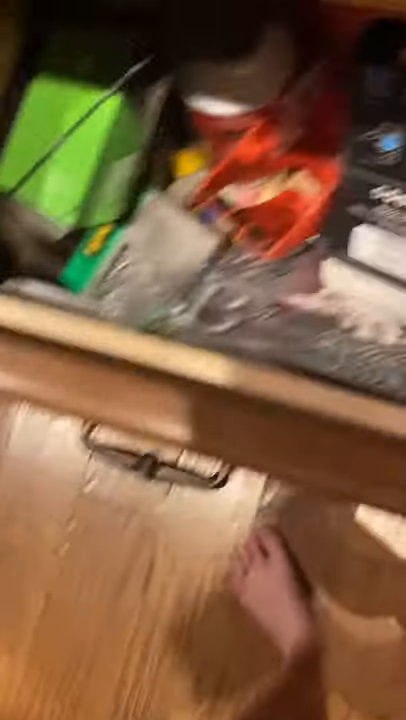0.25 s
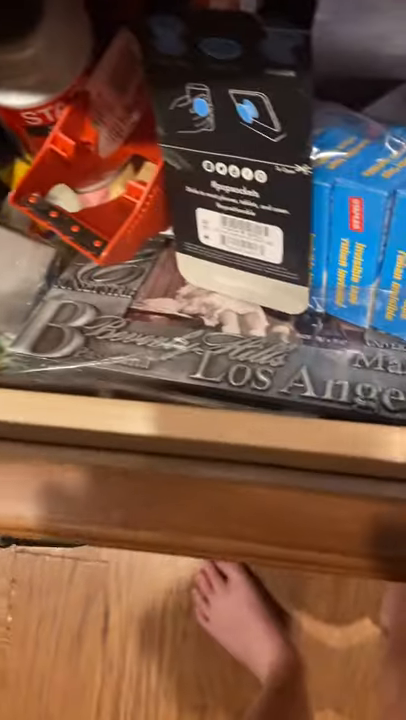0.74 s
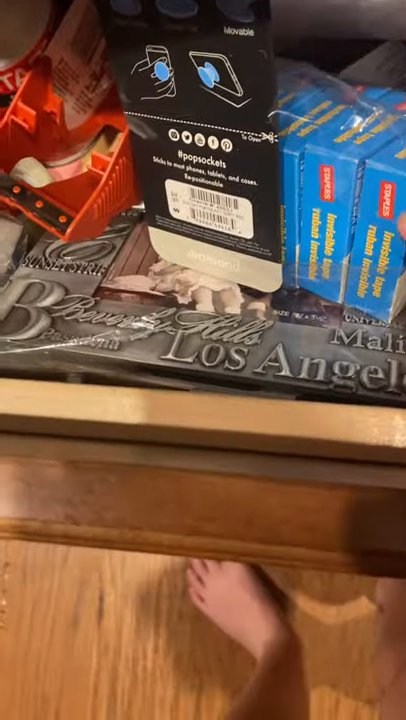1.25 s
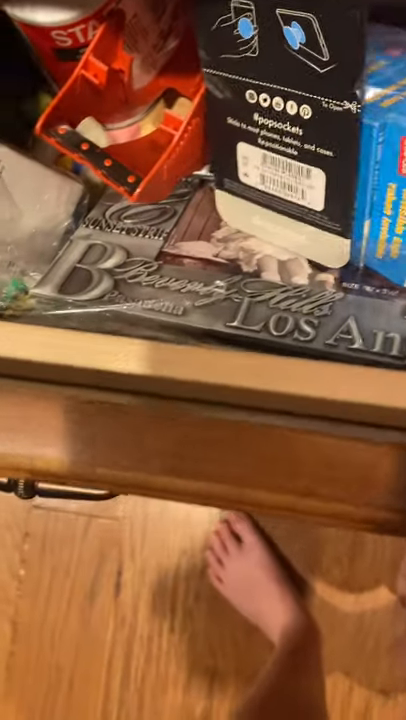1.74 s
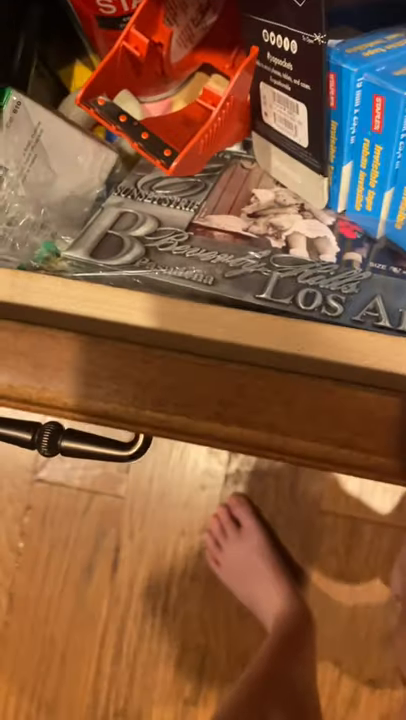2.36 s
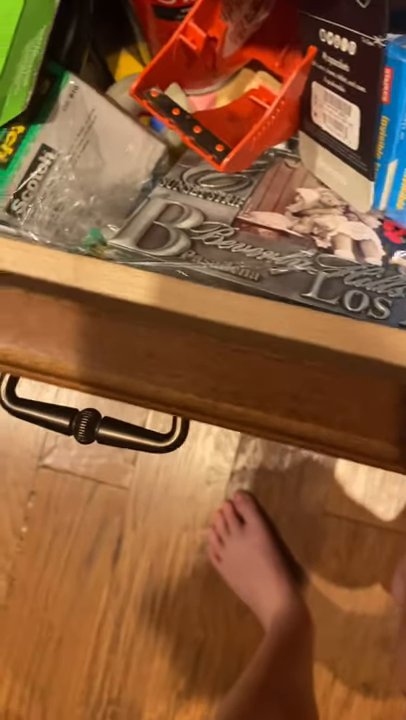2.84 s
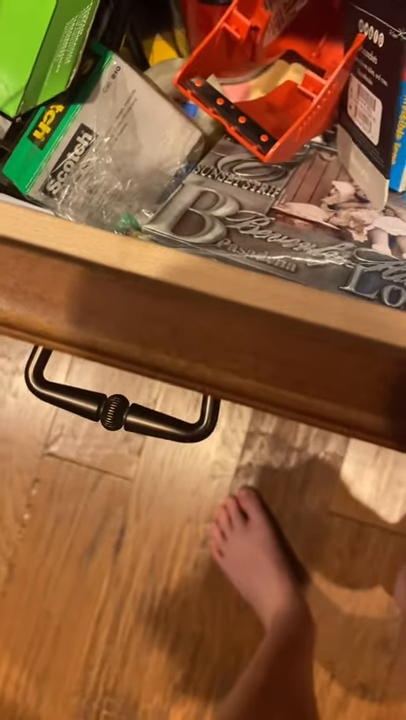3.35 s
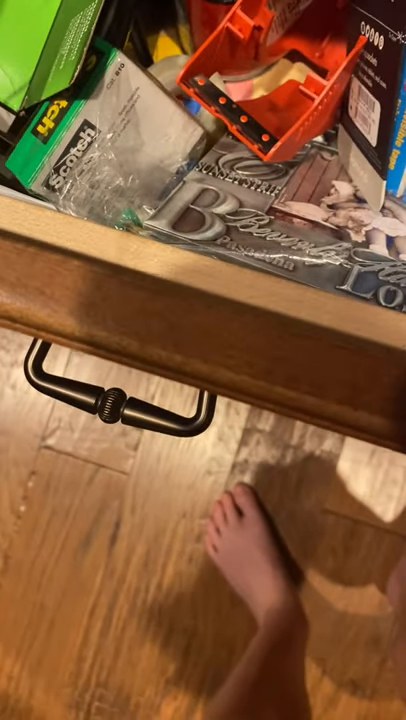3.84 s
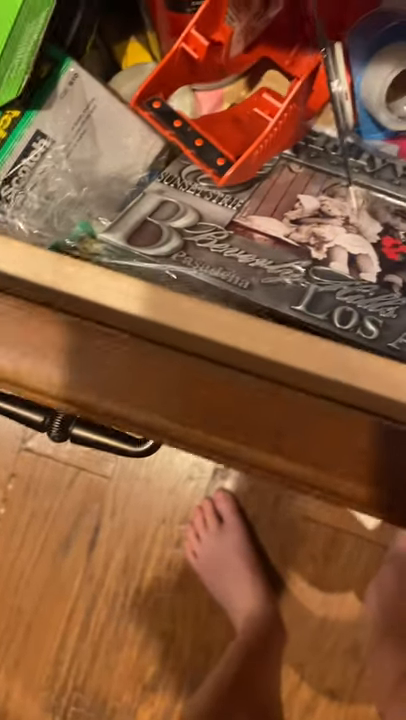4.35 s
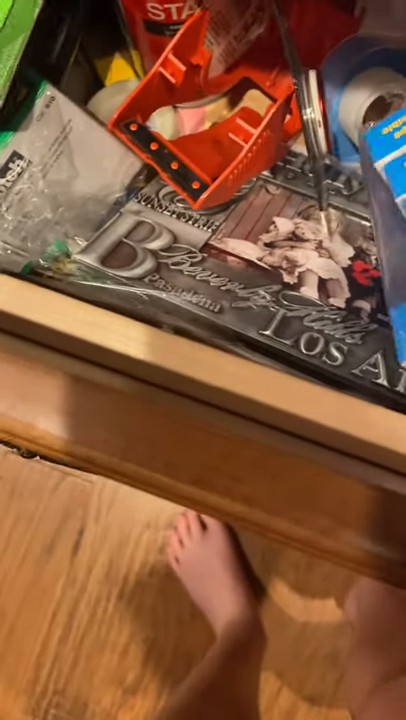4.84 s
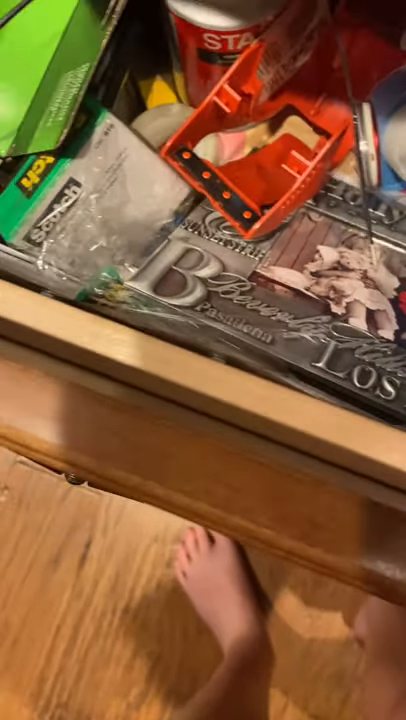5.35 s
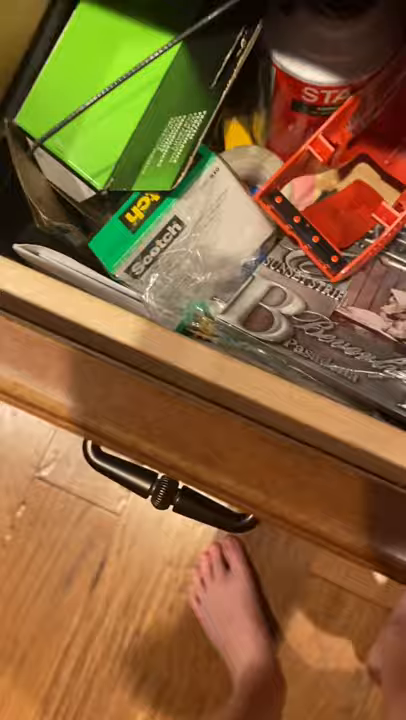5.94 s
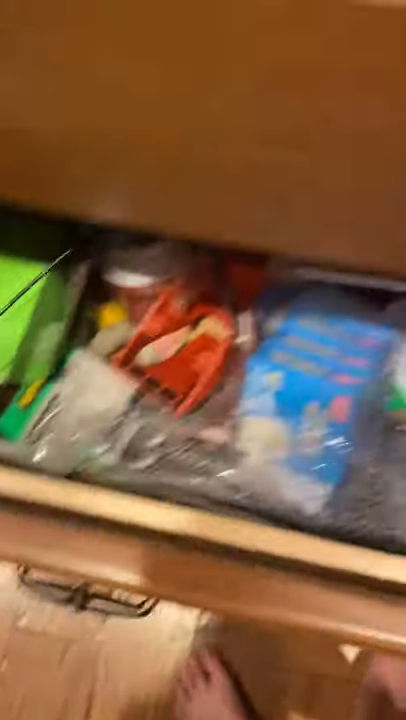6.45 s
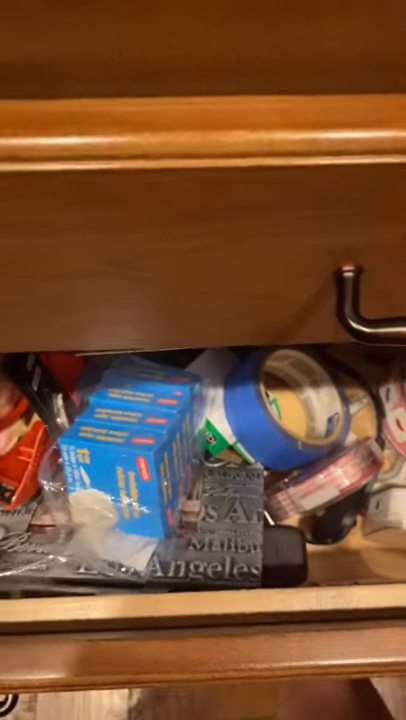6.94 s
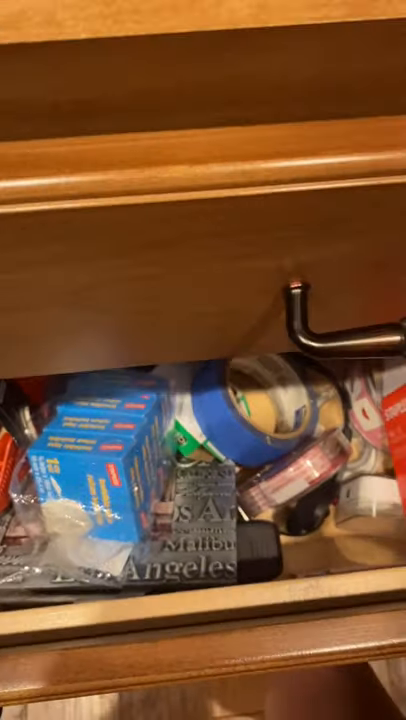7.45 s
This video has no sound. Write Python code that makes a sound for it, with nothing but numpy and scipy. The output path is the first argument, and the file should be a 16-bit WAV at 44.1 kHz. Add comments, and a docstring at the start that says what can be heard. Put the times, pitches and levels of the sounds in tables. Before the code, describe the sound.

A hand rummages in a wooden drawer, plastic wrapping crackling and snapping ever more busily over hollow box knocks, then stops with soft clicks.

```python
"""A short, faint crinkle of thin plastic opens; then snaps, taps and scrapes build as a hand rummages in a
wooden drawer in a small room, pulling about a wrapped pack of cardboard boxes. Film is made of tiny filtered
noise bursts and hiss, taps of noise ticks through resonators, and the boxes of decaying modes, short hollow
notes and rough noise. The pack slides to rest with a low boom and a few last clicks; two spaced microphone
ports hear it all."""
import sys
import numpy as np
from scipy import signal
from scipy.fft import rfft, irfft, next_fast_len
from scipy.io import wavfile
from scipy.ndimage import uniform_filter1d

SR = 44100
rng = np.random.default_rng(int(sys.argv[2]) if len(sys.argv) > 2 else 0)


def int16_out(signal):
    """Quantize to a 16-bit WAV file."""
    q = np.round(np.clip(np.atleast_2d(signal).T, -1, 1) * 32767)
    wavfile.write(sys.argv[1], SR, q.astype(np.int16))


N = 339129
TIME = np.arange(N) / SR  # s

# The hand's grip under the pulls, before layer trims: [t/s, wrapping level/dB, box-shifting level/dB]
GRIP_CURVE = [(0, -50.5, -58), (.12, -85, -87), (.92, -80, -77), (1.1, -65, -65), (1.34, -56, -77),
              (1.46, -45.5, -52.5), (2.17, -46.5, -57), (2.4, -48.5, -48), (2.78, -53.5, -55),
              (3.2, -51.5, -53), (3.8, -39.5, -51), (4.4, -32.5, -39), (4.59, -43.5, -49.5),
              (4.8, -34.5, -41), (5.35, -35.5, -44.5), (5.85, -27.5, -32.5), (6.05, -33, -48),
              (6.37, -36.5, -41), (6.45, -54.5, -43.5), (6.52, -59, -52.5), (6.8, -91.5, -88),
              (7.69, -100, -73)]
# Short pulls and pushes on the pack, before layer trims:
# [start t/s, length/s, wrapping level/dB, box-shifting level/dB]
PULL_EVENTS = [(0, 0.0035, -42, -59), (0.254, 0.07, -56, -67), (0.379, 0.14, -53, -68),
               (0.573, 0.145, -67.5, -71.5), (1.053, 0.02, -48.5, -60), (1.12, 0.039, -44.5, -55),
               (1.22, 0.052, -48.5, -57), (1.52, 0.1, -42.5, -48.5), (1.665, 0.032, -37.5, -48.5),
               (1.792, 0.12, -40.5, -44), (2.266, 0.046, -38.5, -37.5), (2.367, 0.075, -35.5, -48),
               (2.515, 0.071, -38, -44.5), (2.605, 0.065, -35, -46), (2.806, 0.077, -42, -47),
               (2.97, 0.17, -35.5, -46.5), (3.23, 0.14, -43.5, -50), (3.397, 0.19, -34.5, -43.5),
               (3.879, 0.089, -30, -43.5), (4.007, 0.077, -32, -44), (4.199, 0.082, -27.5, -35),
               (4.448, 0.03, -23.5, -40.5), (4.514, 0.042, -31.5, -56), (4.657, 0.11, -27.5, -37),
               (4.806, 0.066, -27.5, -35), (4.953, 0.027, -29, -37), (5.073, 0.063, -27, -40),
               (5.201, 0.1, -34, -34), (5.412, 0.067, -26, -40.5), (5.554, 0.082, -31.5, -50.5),
               (5.694, 0.1, -25, -32), (5.838, 0.14, -31, -35.5), (6.096, 0.0043, -18, -25.5),
               (6.152, 0.11, -28, -33.5), (6.564, 0.13, -49.5, -62), (6.895, 0.2, -83, -56),
               (7.394, 0.054, -100, -64), (7.585, 0.076, -100, -63.5)]
PULL_RISE_S, PULL_RELEASE_S = 0.01, 0.011  # every pull takes hold, holds and lets go alike

# How bright the crinkles sound as the hand moves over the wrapping: [t/s, tilt/(dB per octave)]
CRINKLE_TILT = [(0, -0.5), (1.3, -2), (1.7, -3), (2.5, -1), (3.9, 0.5), (4.4, 0), (5.4, -0.5), (6.2, -1),
                (6.7, 0)]
CRINKLE_DECAY_S, CRINKLE_RISE_S = .001, .0005  # the decay is scaled at random for each crease
CRINKLE_TILT_SCATTER_DB = 2  # creases differ by up to this much per octave either way
FACET_LOW_HZ, FACET_HIGH_HZ = 1486, 6560  # range in which the small facets ring
FACET_FREE_HZ = 1900  # lesser resonances of a facet are free above this, weaker below

# The loudest creases that snap through: [t/s, level/dB, tilt/(dB per octave), facet ring f/Hz]
SNAP_EVENTS = [(0.2015, -62, -2, 4750), (0.2833, -45, 1.5, 1230), (0.299, -36.5, 1, 1780),
               (0.398, -43.0, -0.5, 4770), (0.4252, -36.5, 1.5, 745), (0.4398, -32, 4, 6250),
               (0.5063, -45, -1.5, 1670), (0.9596, -43.5, 2.5, 3530), (1.01, -53, -0.5, 1310),
               (1.052, -37, 2.5, 850), (1.1075, -39.5, 0, 800), (1.144, -37, 2, 2720),
               (1.202, -41.5, -3.5, 5400), (1.239, -39.5, 0.5, 850), (1.258, -37.5, 4, 2010),
               (1.3064, -30.5, 1.5, 740), (1.388, -36.5, -0.5, 3240), (1.4487, -36.5, -4.5, 750),
               (1.5613, -28, -0.5, 2170), (1.578, -35.5, -7.5, 3300), (1.6723, -32, -4.5, 740),
               (1.6911, -27.5, 3, 800), (1.7864, -26.5, -3, 2920), (1.8186, -26.5, 4, 1160),
               (1.826, -25.5, -3.5, 3320), (1.8417, -31.5, -2, 3490), (1.8603, -27.5, -3.5, 2280),
               (1.911, -30.0, -2.5, 2740), (1.978, -35, 9, 1310), (2.029, -28.5, 4.5, 750),
               (2.1158, -33.0, 1, 902), (2.1822, -32, -1.5, 1800), (2.2653, -33, 2, 750),
               (2.2868, -24, -1.0, 2140), (2.3136, -27, 4.5, 2280), (2.3493, -25.5, -1, 1900),
               (2.441, -32, -4.5, 2740), (2.4902, -26.0, -0.5, 4830), (2.5023, -26, 0, 735),
               (2.545, -23.5, 0.0, 6370), (2.634, -26, 1, 1230), (2.6485, -27, 1, 2170),
               (2.756, -30.5, -2.5, 1160), (2.8235, -27, 0.5, 3140), (2.8674, -32, 0.5, 1157),
               (2.9433, -38, 1, 906), (3.017, -35, -5, 2720), (3.0418, -35.5, 6, 965),
               (3.0645, -28, 2.5, 738), (3.2418, -30, -1.5, 750), (3.2664, -26.5, -1, 1018),
               (3.3035, -23.5, -1, 1300), (3.3918, -34.5, -3.0, 1310), (3.417, -24.5, 1, 1174),
               (3.459, -26, 0.5, 856), (3.4796, -26, -2.5, 736), (3.4934, -20, 9, 750),
               (3.522, -25.5, 0.5, 900), (3.544, -23, 1.5, 6640), (3.635, -32.5, 5.5, 750),
               (3.651, -27.5, 0, 795), (3.724, -29.5, 3.5, 1090), (3.7987, -32, 6, 3300),
               (3.8601, -26, 1.5, 1390), (3.964, -26.5, -1.5, 1090), (4.1414, -25.5, -1, 2015),
               (4.2672, -30.5, 4.5, 960), (4.2997, -26.5, -2.5, 852), (4.438, -27.5, 0.5, 4490),
               (4.4625, -20.5, 3.5, 2750), (4.6055, -37.5, 0.5, 1480), (4.6696, -28, 1.5, 750),
               (4.6968, -22, 3.5, 750), (4.8605, -20, 2.5, 850), (5.0097, -29.0, -2.5, 5000),
               (5.042, -29.5, 3, 750), (5.1167, -25.5, 0.5, 3770), (5.1422, -25.5, -1.5, 1570),
               (5.1776, -27.5, 1, 1394), (5.196, -22, 0.5, 800), (5.2949, -23, -2.5, 3510),
               (5.356, -26.5, -1, 1383), (5.43, -22.5, 2.5, 1026), (5.5152, -22, -0.5, 6500),
               (5.563, -23.5, 1, 1890), (5.5933, -19.5, 7, 960), (5.607, -23, -2.5, 1033),
               (5.7043, -23, -2, 906), (5.7899, -25.5, -0.5, 6600), (6.0236, -22.5, -1, 1170),
               (6.0536, -28.5, 2.5, 2310), (6.1023, -30, -1, 1160), (6.148, -25.5, -1, 2130),
               (6.1632, -22.5, 6.5, 4810), (6.1866, -21.5, 0, 2403), (6.2165, -19, 5.5, 1017),
               (6.249, -23, 1, 1157), (6.3287, -29.5, 0, 1230), (6.405, -33.5, -1, 6110),
               (6.4953, -42, -0.5, 2740), (6.659, -35, -1.5, 748)]
SNAP_DECAY_S, SNAP_SCATTER = .0012, .4  # base decay, and the random part of it
SNAP_HALVING_DB = 13  # a crease this much brighter per octave dies twice as fast

# Hard things tapping each other, mostly plastic, a few of them cardboard boxes: # [t/s, level/dB, ring f/Hz,
# upper ring f/Hz, ring strength against the tick]
TAP_EVENTS = [(0.4794, -56, 800, 2200, 1.8), (0.55, -32, 2750, 4900, 2.7), (0.569, -50, 1900, 1400, 2.6),
              (0.6154, -33.5, 2040, 3900, 0.36), (1.1247, -32.5, 793, 2300, 4.9),
              (4.834, -25, 1090, 5428, 3), (5.497, -23.5, 1498, 3600, 4.8),
              (5.8337, -27.5, 2120, 5250, 4.6), (6.577, -21.5, 2390, 4510, 4.3),
              (7.0871, -30.5, 1214, 2220, 4.1), (7.161, -53.5, 1290, 1850, 12),
              (7.1957, -33, 1795, 5000, 4.2)]

# Boxes bumping the drawer: [t/s, level/dB, pitch factor on the modes]
KNOCK_EVENTS = [(0.648, -57.5, 1.5), (1.404, -36, 0.9), (1.904, -39, 1.17), (2.0609, -40, 2),
                (2.065, -40, 1.22), (2.2194, -27.5, 0.81), (2.2205, -44.5, 2.6), (2.249, -33.5, 0.81),
                (2.641, -38, 1.4), (2.827, -43.5, 1), (2.852, -48, 1.32), (3.415, -36, 1.1),
                (3.477, -39, 1.03), (3.951, -29, 1.13), (4.042, -40.5, 0.8), (4.241, -32, 0.91),
                (4.346, -8.5, 1.016), (4.392, -32.5, 0.83), (4.469, -26.5, .9), (4.479, -28.5, .6),
                (4.788, -33.5, 0.93), (4.865, -31, 0.99), (5.048, -34, 1.42), (5.104, -39, 1.03),
                (5.702, -28.5, 1.05), (5.798, -21, 0.78), (5.801, -27, 3.3), (5.952, -26.5, 1),
                (6.021, -28, 0.93), (6.105, -34, 0.23), (6.107, -30, 0.69), (6.158, -31.5, 0.8),
                (6.2, -27, 1.4), (6.256, -30, 1.1), (6.333, -33.5, 0.68), (6.63, -47, 1.23),
                (6.891, -41, 0.83), (6.89, -43.5, 1.66), (6.954, -46.5, 1.38), (6.999, -42.5, 2.4),
                (7.002, -42.5, 1.27), (7.013, -42, 0.65), (7.393, -65, 2.35), (7.413, -58.5, 1)]
# Resonances of a box on the drawer floor at pitch 1: [f/Hz, relative level/dB, t60/s]
BOX_MODES = [(122, -10.5, .3), (168, -3.5, .3), (200, -8.5, .15), (235, -12, .09), (283, .5, .15),
             (359, -2.5, .15), (517, -3.5, .04), (630, -14, .07), (953, -8.5, .07)]
HARDNESS_HZ, HARDER_WITH_LEVEL = 802, 0.034  # contact corner at pitch 1 and 0 dB; its growth per dB
BLOW_CYCLES = 2.0  # the modes line up this many cycles of the main mode into a blow

# The cardboard pack slides to rest, before the layer trim: [start t/s, length/s, level/dB]
SLIDE_STROKES = [(6.024, 0.0043, -32.5), (6.191, .016, -31.5), (6.245, 0.0036, -44), (6.574, 0.015, -41.5),
                 (6.624, 0.017, -40), (6.654, 0.0051, -51), (6.89, 0.0094, -51), (6.918, 0.19, -56.5),
                 (6.991, .004, -40), (7.045, .015, -55), (7.394, 0.027, -75.5)]
SLIP_RISE_S, SLIP_RELEASE_S = .004, .026

# The drawer itself shifts with a rumble, then its panel rings out
RUMBLE_START_S, RUMBLE_LENGTH_S, RUMBLE_DB = 6.9, 0.18, -48
RUMBLE_LOW_HZ, RUMBLE_HIGH_HZ = 75, 233
BOOM_S, BOOM_DB, BOOM_HZ, BOOM_T60_S = 7.068, -38.5, 95.6, 0.4

# Colour of a snapping crease: [f/Hz, relative level/dB]
CREASE_SPECTRUM = [(100, -32.5), (400, -11.5), (780, -4), (1200, -7), (2300, -1.1), (3000, -2), (4200, 3.5),
                   (5300, 5), (7500, 3.5), (10500, 2), (12500, 3.5), (15000, -2.3)]
# Colour of the thin film and of the tap ticks: [f/Hz, relative level/dB]
FILM_SPECTRUM = [(100, -16), (400, -10.5), (780, -5), (1200, -5), (2300, -4), (3000, -4), (4200, -1.5),
                 (5300, 1.5), (7500, -1), (10500, 0), (12500, -1), (15600, -3)]
# Hollow colour of the drawer floor at pitch 1: [f/Hz, relative level/dB]
DRAWER_SPECTRUM = [(25, -24), (55, -8), (95, -7), (125, -3.5), (170, 1.5), (220, -1.5), (285, 4.5),
                   (375, 2), (470, -10), (750, -13), (1200, -24.5), (3000, -46)]
# Pitch factors on the drawer colour as the load shifts: [factor]
DRAWER_PITCHES = [.9, 1, 1.15]
# Colour of rubbing cardboard: [f/Hz, relative level/dB]
CARDBOARD_SPECTRUM = [(120, 7.5), (420, 0), (520, -14.5), (620, 1.5), (720, -5.5), (830, -14.5), (1050, -2),
                      (1700, 0), (2300, -5.5), (4000, -10), (6000, -18.5), (15000, -28.5)]
# Colour of the room's quiet background: [f/Hz, relative level/dB]
AIR_SPECTRUM = [(20, 1.5), (55, 12), (120, 5), (300, -11), (550, -5.5), (750, -10.5), (1200, -21),
                (2500, -23), (6000, -22), (16000, -25.5)]

# Decay of the room's tail: [f/Hz, t60/s]
ROOM_DECAY = [(100, 0.3), (300, 0.35), (1500, 0.45), (5000, 0.34), (10000, 0.077), (16000, 0.077)]
# Phase by which the left microphone port leads: [f/Hz, phase/rad]
LEFT_LEAD = [(20, 0), (2400, .1), (3000, 1.5), (3600, .8), (4400, .8), (5000, .15), (6000, 1.6), (6900, 3),
             (7900, 3.3), (9800, 6.15), (11200, 6.6), (12700, 9), (14200, 9.75), (15700, 12)]
# Likeness of the two ports' signals: [f/Hz, share from 0 to 1]
LIKENESS = [(100, .99), (400, .985), (650, .88), (2100, .95), (2850, .55), (3400, .8), (4600, .68),
            (7300, .95), (8800, .74), (10300, .92), (15500, .72)]
# Left port minus right port: [f/Hz, level/dB]
LEFT_RIGHT_BALANCE = [(60, -.5), (300, -2.46), (650, -7), (1500, -1.5), (2100, 0), (2800, -5.5), (3500, 0),
                      (4300, -2), (5200, 1), (7000, -0.5)]
EDGE_HZ = 15850  # upper band limit


def amp(db):
    """Amplitude of a level in dB."""
    return 10 ** (np.asarray(db) / 20)


def evened(x):
    """Scales to rms 1."""
    return x / np.sqrt(np.mean(x ** 2) + 1e-20)


def read(points, hz):
    """Reads a table on a log-frequency axis."""
    f, value = np.transpose(points)
    return np.interp(np.log(hz + 1), np.log(f + 1), value)


def follow(rows):
    """The columns of a curve at every sample."""
    s, *columns = np.transpose(rows)
    return [np.interp(TIME, s, column) for column in columns]


def add(mix, s, sound):
    """Mixes a sound in at time s."""
    part = mix[..., max(round(s * SR), 0):][..., :sound.shape[-1]]
    part += sound[..., :part.shape[-1]]


def smooth(x, seconds):
    """Two running means in a row."""
    size = max(int(seconds * SR), 1)
    return uniform_filter1d(uniform_filter1d(x, size), size)


def octaves(hz):
    """Octaves from the middle of the treble, over the range in which brightness acts."""
    return np.log2(np.clip(hz, 1000, 12000) / 4000)


def causal(gain_db):
    """Frequency response with this gain whose ringing follows the attack (minimum phase)."""
    cepstrum = irfft(np.log(amp(gain_db)))
    half = cepstrum.shape[-1] // 2
    cepstrum[..., 1:half] *= 2
    cepstrum[..., half + 1:] = 0
    return np.exp(rfft(cepstrum))


def colour(x, spectrum, size=4096):
    """Filters by a spectrum and keeps the power of white noise."""
    response = irfft(causal(read(spectrum, np.fft.rfftfreq(size, 1 / SR))))
    response /= np.linalg.norm(response)
    return signal.oaconvolve(x, response[None], axes=1)[:, :x.shape[1]]


def grain_power(per_s, spread_db, decay_s, even_s):
    """Power of random grains of varied size, each dying quickly, evened to a local mean of about 1."""
    sizes = amp(spread_db * np.minimum(rng.exponential(1, N), 4)) ** 2
    kicks = sizes * (rng.random(N) < per_s / SR)
    power = signal.lfilter([1], [1, -np.exp(-2 / (decay_s * SR))], kicks) + 1e-6
    return power / np.maximum(smooth(power, even_s), 1e-6)


def stroke(start, length, rise_s, release_s):
    """Attack, hold and release of one movement, between 0 and 1 at every sample."""
    attack = np.clip((TIME - start) / rise_s, 0, 1)
    return attack * np.exp(-np.clip((TIME - start - length) / release_s, 0, 20))


def effort():
    """Grip and pulls add in power: the wrapping and box-shifting levels in dB at every sample."""
    film, boxes = amp(follow(GRIP_CURVE)) ** 2
    for start, length, film_db, boxes_db in PULL_EVENTS:
        power = stroke(start, length, PULL_RISE_S, PULL_RELEASE_S) ** 2
        film = film + amp(film_db) ** 2 * power
        boxes = boxes + amp(boxes_db) ** 2 * power
    return 10 * np.log10(film), 10 * np.log10(boxes)


def cracks(shape, spectrum, tilt_db, ring_hz, ring_db, own_db, sharpness=6.2, count=20):
    """Unit-energy bursts (2, events, samples): each facet has a main ring and lesser treble resonances."""
    events, size = shape.shape
    hz = np.fft.rfftfreq(size, 1 / SR)
    knots = np.linspace(np.sqrt(300), np.sqrt(EDGE_HZ), count)
    bumps = np.array([np.interp(np.sqrt(hz), knots, row) for row in np.eye(count)])
    bumps *= np.minimum(hz / FACET_FREE_HZ, 1)
    own = own_db * rng.standard_normal((events, count)) @ bumps
    ratio = (hz + 1) / ring_hz[:, None]
    ring = 10 * np.log10(1 + amp(ring_db) ** 2 / (1 + (sharpness * (ratio - 1 / ratio)) ** 2))
    gain_db = read(spectrum, hz) + ring + tilt_db[:, None] * octaves(hz) + own
    noise = rng.standard_normal((2, events, size))
    burst = rfft(shape * noise) * causal(gain_db)
    energy = (abs(burst[..., hz < EDGE_HZ]) ** 2).sum(-1, keepdims=True) * 2 / size
    return irfft(burst / np.sqrt(energy))


def crinkle(level_db, per_s=600, busy_growth=.35, spread_db=5.0, count=7000, size=256):
    """Tiny creases buckle in the film, mostly faint and a few loud; harder work makes them denser."""
    tilt_db, = follow(CRINKLE_TILT)
    place, chance, strength, ring, stiffness, facet = rng.random((count, 6)).T
    at, t = (place * (N - size)).astype(int), np.arange(size) / SR
    # per_s holds 9.5 dB below the hardest work
    rate = per_s * amp(busy_growth * (level_db[at] - level_db.max() + 9.5))
    sizes = amp(spread_db * np.minimum(-np.log(strength), 3.7))
    sizes *= chance < rate * N / SR / count
    decay_s = CRINKLE_DECAY_S * (.5 + ring[:, None])
    shape = np.exp(-t / decay_s) * (1 - np.exp(-t / CRINKLE_RISE_S))
    ring_hz = FACET_LOW_HZ * (FACET_HIGH_HZ / FACET_LOW_HZ) ** facet
    tilts = tilt_db[at] + CRINKLE_TILT_SCATTER_DB * (2 * stiffness - 1)
    grains = sizes[:, None] * cracks(shape, FILM_SPECTRUM, tilts, ring_hz, ring_db=6.5, own_db=4.0)
    where = (at[:, None] + np.arange(size)).ravel()
    film = np.array([np.bincount(where, side.ravel(), N) for side in grains])
    # the creases share out the work that the hand puts in
    local_power = smooth((film ** 2).mean(0), 0.033)
    return amp(level_db) * film / np.sqrt(np.maximum(local_power, 1e-4))


def scrape(level_db, gain_db=-6, growth=0.43):
    """Film catches and slides over cardboard: a rough hiss that gains on the crinkle in hard pulls."""
    catches = grain_power(per_s=650, spread_db=-1.5, decay_s=0.0039, even_s=0.099)
    hiss = colour(np.sqrt(catches) * rng.standard_normal((2, N)), FILM_SPECTRUM)
    return amp(level_db + gain_db + growth * (level_db - level_db.max())) * hiss


def jostle(level_db, gain_db=-4.0, shift_s=.06):
    """Boxes stick and slip on the drawer floor; its hollow rumble changes pitch as their weight shifts."""
    slips = grain_power(per_s=300, spread_db=1, decay_s=.004, even_s=.02)
    shares = abs(smooth(rng.standard_normal((len(DRAWER_PITCHES), N)), shift_s))
    shares /= np.linalg.norm(shares, axis=0) + 1e-12
    rumble = np.zeros((2, N))
    for pitch, share in zip(DRAWER_PITCHES, shares):
        spectrum = [(hz * pitch, db) for hz, db in DRAWER_SPECTRUM]
        rumble += colour(share * np.sqrt(slips) * rng.standard_normal((2, N)), spectrum)
    return amp(level_db + gain_db) * rumble


def clatter(level_db, gain_db=-9.0, per_s=130, low_hz=520, high_hz=2200, sharpness=6.7, count=14):
    """Box corners and small things nudge each other, each with a short hollow note of its own."""
    out = np.zeros(N)
    for hz in np.geomspace(low_hz, high_hz, count):
        nudges = rng.uniform(-1.01, 1, N) * (rng.random(N) < per_s / count / SR)
        out += np.sqrt(low_hz / hz) * signal.lfilter(*signal.iirpeak(hz, sharpness, SR), nudges)
    return amp(level_db + gain_db) * evened(out)


def air(level_db=-73):
    """The quiet background of the room: steady coloured noise."""
    return amp(level_db) * colour(rng.standard_normal((2, N)), AIR_SPECTRUM)


def snaps(rattle_db=-19, rattle_s=0.0084, rise_s=0.00055, size=2048):
    """A crease flips with a sharp crack, and the sheet around it shivers briefly."""
    out, t = np.zeros((2, N)), np.arange(size) / SR
    s, db, tilt_db, ring_hz = np.transpose(SNAP_EVENTS)
    decay_s = SNAP_DECAY_S * (1 + SNAP_SCATTER * rng.uniform(-0.51, 1, (len(s), 1)))
    decay_s = decay_s * .5 ** np.clip(tilt_db[:, None] / SNAP_HALVING_DB, -1, 1)
    shape = np.exp(-t / decay_s) + amp(rattle_db) * np.exp(-t / rattle_s)
    shape *= 1 - np.exp(-t / rise_s)
    bursts = cracks(shape, CREASE_SPECTRUM, tilt_db, ring_hz, ring_db=11.0, own_db=3.0)
    bursts *= np.sqrt(.006 * SR)  # energy of 6 ms at rms 1
    for k in range(len(s)):
        add(out, s[k] - rise_s, amp(db[k]) * bursts[:, k])
    return out


def taps(upper=0.13, sharpness=3.3, linger=1.5, linger_sharpness=70, tick_s=0.0026, tilt_db=2,
         rattle_db=-25, rattle_s=0.018, size=4096):
    """A tick of contact excites two short resonances of a small plastic shell or a box; the first one lingers."""
    out, t = np.zeros((2, N)), np.arange(size) / SR
    spectrum = [(f, level + tilt_db * octaves(f)) for f, level in FILM_SPECTRUM]
    shape = np.exp(-t / tick_s) + amp(rattle_db) * np.exp(-t / rattle_s)
    shape *= 1 - np.exp(-t / 0.00018)
    for s, db, hz, upper_hz, shell in TAP_EVENTS:
        tick = colour(rng.standard_normal((2, size)) * shape, spectrum)
        rings = [(1, hz, sharpness), (upper, upper_hz, sharpness), (linger, hz, linger_sharpness)]
        ringing = sum(g * signal.lfilter(*signal.iirpeak(f, q, SR), tick) for g, f, q in rings)
        sound = evened(tick + shell * ringing)
        add(out, s, amp(db) * sound * np.sqrt(.006 * SR / size))  # energy of 6 ms at rms 1
    return out


def knocks(rise_cycles=1.94, thud_cycles=4.2, linger_db=-16, scuff_db=-23, scuff_s=0.014, size=16000):
    """A bump swells the modes, high ones first; clutter damps them in a few cycles, a faint ring lingers."""
    out, t = np.zeros(N), np.arange(size) / SR
    mode_hz, mode_db, t60 = np.transpose(BOX_MODES)[:, :, None]
    main_mode_hz = mode_hz[np.argmax(mode_db)]
    for s, db, pitch in KNOCK_EVENTS:
        hz, main_hz = mode_hz * pitch, main_mode_hz * pitch
        corner_hz = HARDNESS_HZ * pitch * amp(HARDER_WITH_LEVEL * db)  # higher, louder knocks are harder
        swell = 1 - np.exp(-(t * hz / rise_cycles) ** 2)
        damping = np.exp(-(t * main_hz / thud_cycles) ** 2) + amp(linger_db)
        swing = np.sin(2 * np.pi * hz * (t - BLOW_CYCLES / main_hz))
        ring = amp(mode_db - 60 * t * np.sqrt(pitch) / t60) * swell * damping * swing
        thud = (ring / np.sqrt(1 + (hz / corner_hz) ** 4)).sum(0)  # soft contact mutes the upper modes
        thud /= np.sqrt(np.sum(thud ** 2) / (.01 * SR))  # energy of 10 ms at rms 1
        contact = signal.butter(2, min(2 * corner_hz, SR / 4), fs=SR)
        scuff = evened(signal.lfilter(*contact, rng.standard_normal(size))) * np.exp(-t / scuff_s)
        add(out, s, amp(db) * (thud + amp(scuff_db) * scuff))
    return out


def slide(gain_db=-2.0):
    """Cardboard rubs along the drawer floor in short slips and one longer rough scrape."""
    level = np.zeros(N)
    for s, length, db in SLIDE_STROKES:
        level += amp(db + gain_db) * stroke(s, length, SLIP_RISE_S, SLIP_RELEASE_S)
    slips = grain_power(per_s=550, spread_db=4.5, decay_s=0.0025, even_s=.02)
    return level * colour(np.sqrt(slips) * rng.standard_normal((2, N)), CARDBOARD_SPECTRUM)


def drawer_shift(rise_s=0.01, release_s=0.057):
    """The whole drawer rumbles as it moves; as it stops, its panel booms and dies away."""
    band = signal.butter(2, [RUMBLE_LOW_HZ, RUMBLE_HIGH_HZ], "band", fs=SR, output="sos")
    rumble = evened(signal.sosfilt(band, rng.standard_normal(N)))
    rumble *= stroke(RUMBLE_START_S, RUMBLE_LENGTH_S, rise_s, release_s)
    t = np.maximum(TIME - BOOM_S, 0)
    decay = amp(BOOM_DB - 60 * t / BOOM_T60_S)
    boom = np.minimum(t / rise_s, 1) * decay * np.sin(2 * np.pi * BOOM_HZ * t)
    return amp(RUMBLE_DB) * rumble + boom


def room(x, near_db=-13, near_s=0.0011, far_db=-19):
    """Quick echoes from the drawer walls, then the faint tail of the room, dying at its own rate per band."""
    t = np.arange(SR // 2) / SR
    shape = (2, len(t))
    echo_pulses = rng.choice([-1., 1.], shape) * (rng.random(shape) < 4000 / SR) * (t > .002)
    hz, frame_s, bands = signal.stft(echo_pulses, SR, nperseg=256)
    decay = amp(-60 * frame_s / read(ROOM_DECAY, hz)[:, None])
    far = signal.istft(bands * decay, SR, nperseg=256)[1][:, :len(t)]
    near = echo_pulses * np.exp(-t / near_s)
    echoes = amp(near_db) * near / np.linalg.norm(near[0]) + amp(far_db) * far / np.linalg.norm(far[0])
    return signal.fftconvolve(x, echoes, axes=1)[:, :N]


def ports(x):
    """Two spaced microphone ports: the left leads in phase, and likeness and balance vary with pitch."""
    size = next_fast_len(N + SR // 10)
    hz = np.fft.rfftfreq(size, 1 / SR)
    shared, separate = rfft(x, size)
    same = np.clip(read(LIKENESS, hz), 0, 1)
    delay = np.exp(-1j * read(LEFT_LEAD, hz))
    lean = amp(read(LEFT_RIGHT_BALANCE, hz) / 2)
    left = shared * lean
    right = (same * shared + np.sqrt(1 - same ** 2) * separate) * delay / lean
    return irfft(np.array([left, right]), size)[:, :N]


def scene():
    """Wrapping and boxes in the drawer, with echoes and background, heard by both ports."""
    film_db, boxes_db = effort()
    contents = crinkle(film_db) + scrape(film_db) + jostle(boxes_db) + snaps() + taps() + slide()
    contents[0] += clatter(boxes_db) + knocks() + drawer_shift()  # row 0 is what both ports share
    return ports(contents + room(contents) + air())


def record(dry, low_cut_hz=45):
    """The microphone's bass roll-off and the recorder's band limit."""
    thinned = signal.lfilter(*signal.butter(2, low_cut_hz, "high", fs=SR), dry)
    band_limit = signal.firwin(401, EDGE_HZ, window=("kaiser", 8), fs=SR)
    return signal.oaconvolve(thinned, band_limit[None], "same")


dry = scene()
out = record(dry)
int16_out(out)
```